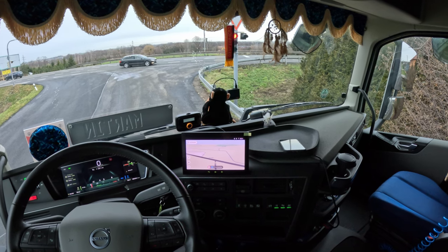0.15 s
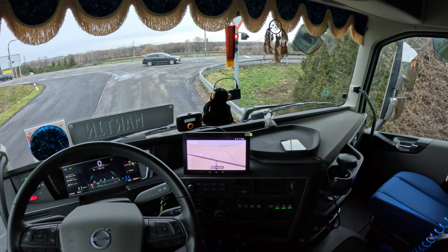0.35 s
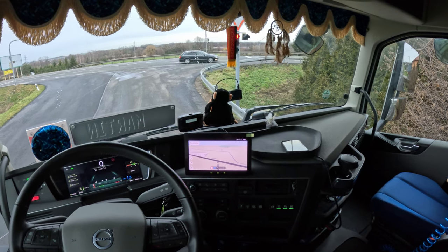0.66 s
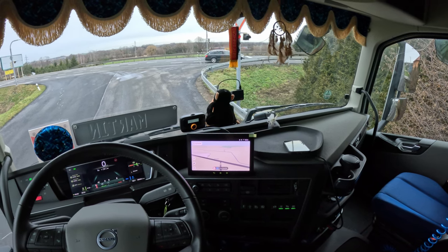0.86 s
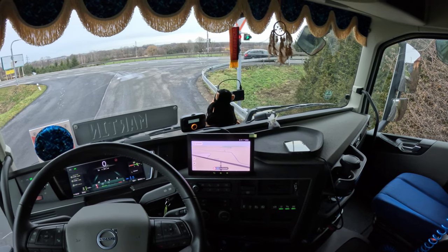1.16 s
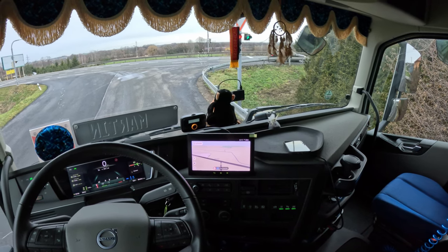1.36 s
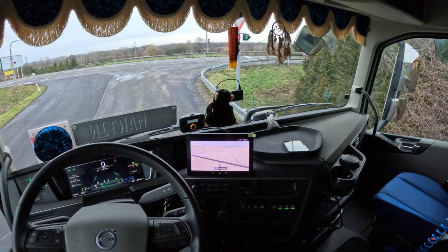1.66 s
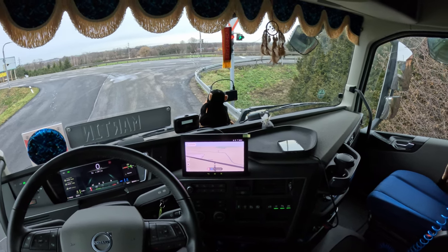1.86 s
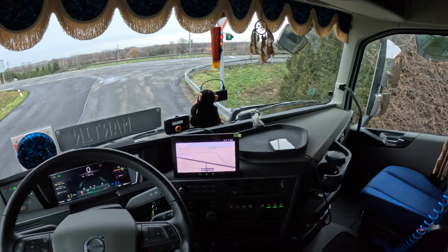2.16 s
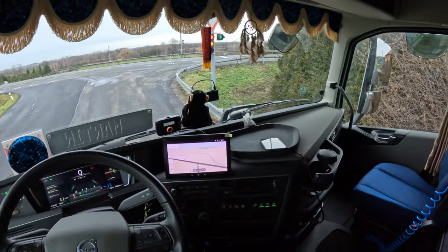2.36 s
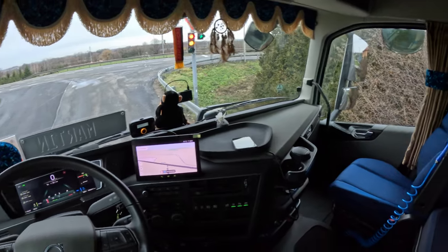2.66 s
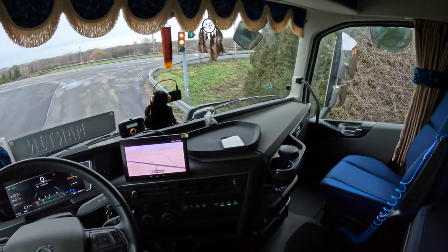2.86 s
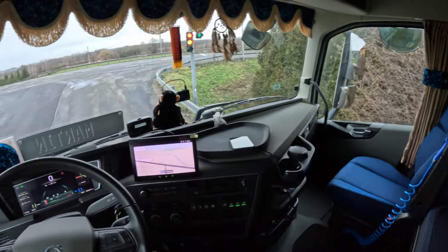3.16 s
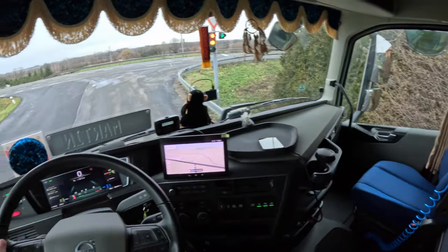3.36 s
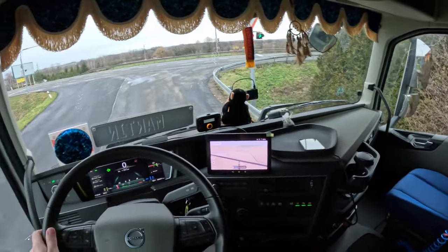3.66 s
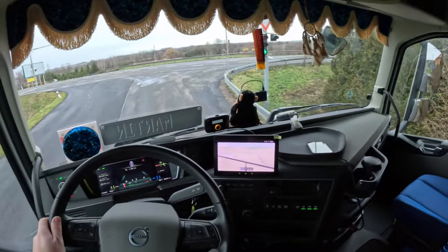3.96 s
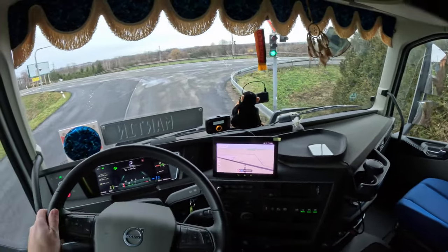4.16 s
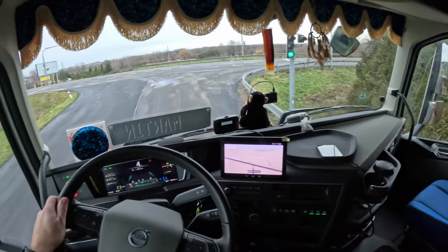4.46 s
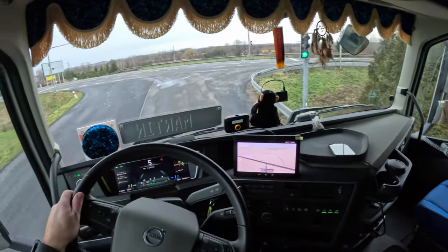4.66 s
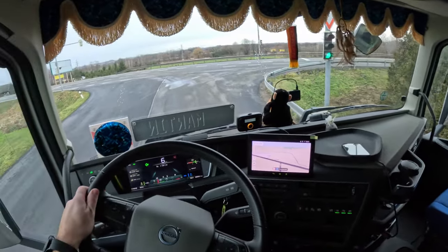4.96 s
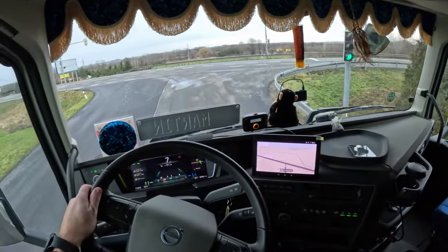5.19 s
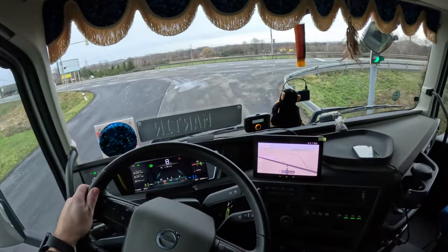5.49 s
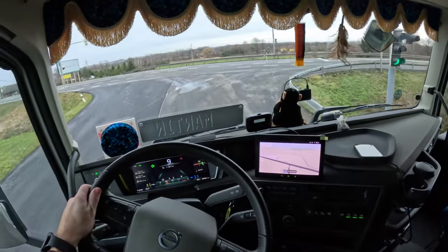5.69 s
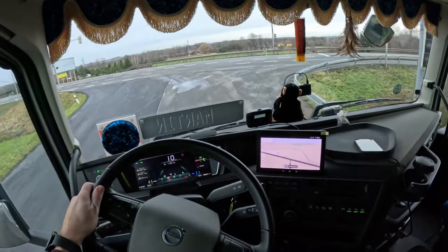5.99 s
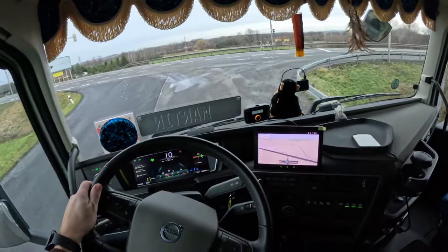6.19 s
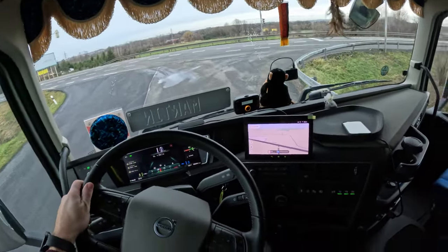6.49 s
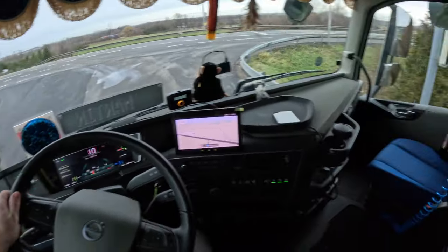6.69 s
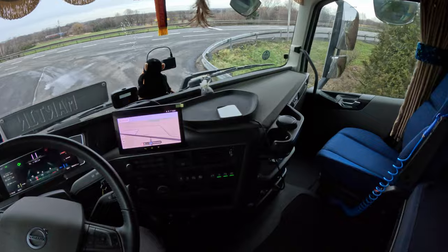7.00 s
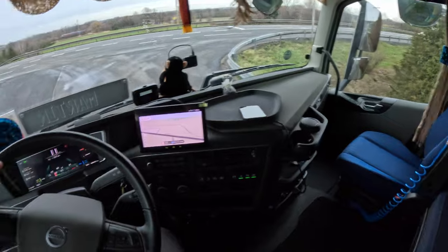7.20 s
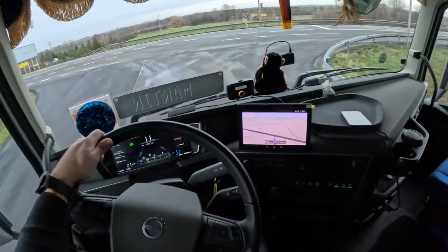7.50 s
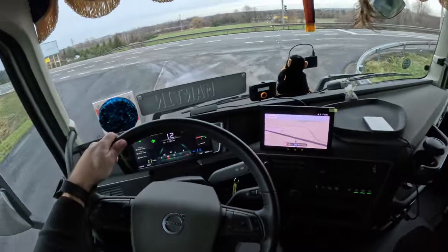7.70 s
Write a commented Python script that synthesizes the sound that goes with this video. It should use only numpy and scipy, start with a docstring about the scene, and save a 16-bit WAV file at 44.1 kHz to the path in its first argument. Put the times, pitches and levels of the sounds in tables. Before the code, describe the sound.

Heard from the driver's head inside a padded truck cab: a heavy diesel idles low and steady. At two seconds a dull double thump lands with a short air hiss and chirp. A stalk snaps over, the indicator starts a regular tick-tock, and the engine takes load, trim rattling briefly. It revs up in a growing roar, sags at a gear change with air puffs, then climbs again.

```python
"""A diesel engine idles, takes load and pulls away through a gear change, inside the cab of a heavy truck.
Over it come brake-air hisses and a thump, loose trim, a stalk snap, indicator ticks and a turbo whistle.
Engine tones are sines locked to the firing rate; roar, chassis rumble and air are noise shaped in frequency.
Knocks are decaying modes or short noise bursts, with a brief padded echo of the cab.
"""
import sys
import numpy as np
from scipy import signal
from scipy.fft import rfft, irfft
from scipy.io import wavfile
from scipy.ndimage import uniform_filter1d

SR = 44100
rng = np.random.default_rng(int(sys.argv[2]) if len(sys.argv) > 2 else 0)


def wav_record(signal):
    """Record a signal, one row per channel, as 16-bit PCM in the file named by sys.argv[1]."""
    frames = np.transpose(np.atleast_2d(signal))
    bounded = np.clip(frames, -1, 1)
    # unit amplitude maps onto the largest positive 16-bit level
    quanta = np.round(bounded * 32767).astype(np.int16)
    wavfile.write(sys.argv[1], SR, quanta)


N = 345743
T = np.arange(N) / SR
GEAR = 31 / 6  # gear whine as a multiple of the firing rate
TRIM_T60 = 0.04  # s, decay time of loose trim

# Spectrum of loose trim striking its seat: hz, density_db (dB per Hz)
TRIM_SPECTRUM = [(800, -26), (2000, 7.5), (3500, -0.5), (7000, -10), (9000, -19), (13000, -43.5)]
# Spectrum of the dry scratch under the indicator and the thumps: hz, density_db (dB per Hz)
SCRATCH_SPECTRUM = [(700, -26.5), (1100, 5), (1500, -3), (2200, -12.5), (3800, -14), (5000, -33),
                    (9000, -57.5)]


def gain_of(db):
    """Decibel law: converts a level in dB to an amplitude ratio."""
    return 10 ** (np.asarray(db) / 20)


def evened(x):
    """Normalisation by mean power: scales a signal to rms 1."""
    return x / np.sqrt(np.mean(x ** 2) + 1e-20)


def read(points, hz):
    """Logarithmic frequency scale: interpolates a spectrum between its points along log frequency."""
    f, value = np.transpose(points)
    return np.interp(np.log(hz + 1), np.log(f + 1), value)


def add(mix, s, sound):
    """Superposition: sums a sound into the mix from time s, cut at the end of the mix."""
    part = mix[..., round(s * SR):][..., :sound.shape[-1]]
    part += sound[..., :part.shape[-1]]


def drift(rate_hz, size=N):
    """Band-limited random fluctuation: random knots at rate_hz, resampled smoothly to rms 1."""
    knots = rng.standard_normal(int(size / SR * rate_hz) + 3)
    return evened(signal.resample(knots, size))


def noise(shape_db, patchy_db, size=1024):
    """Partly coherent stereo noise: shape_db(hz, s) sets its level over frequency and time."""
    # Likeness of left and right: hz, coherence (1 = the same)
    likeness = [(60, 1), (290, .98), (630, .9), (1370, .8), (3000, .7), (14300, .6)]
    # Phase by which the left leads: hz, lead_rad
    phase_lead = [(100, 0), (1810, -.6), (3530, -.6), (4480, 0)]
    # Level difference, left minus right: hz, lean_db
    level_lean = [(60, .5), (370, -.7), (1260, 1.5), (7800, 2.5), (14300, 7)]
    hop = size // 4
    frames, hz = N // hop + 5, np.fft.rfftfreq(size, 1 / SR)
    a, b, c, d, patches = rng.standard_normal((frames, len(hz), 5)).T
    # random patches of level, smoothed over neighbouring bins and frames
    patches = uniform_filter1d(patches, size=size // 100, axis=0)
    patches = evened(uniform_filter1d(patches, size=4096 // hop, axis=1))

    same = np.clip(read(likeness, hz), -1, 1)[:, None]
    left = a + 1j * b
    independent = c + 1j * d
    shared = same * left * np.exp(-1j * read(phase_lead, hz))[:, None]
    right = shared + np.sqrt(1 - same ** 2) * independent
    lean = gain_of(read(level_lean, hz) / 2)[:, None]

    frame_s = np.arange(frames) * hop / SR
    amplitude = gain_of(shape_db(hz, frame_s) + patchy_db * patches)
    spectra = np.array([left * lean, right / lean]) * amplitude
    return signal.istft(spectra, nperseg=size, noverlap=size - hop)[1][:, :N]


def banded(points, hz, lo_hz, hi_hz):
    """Power summed over a band: scales a spectrum so that noise made from it has rms 1 between lo and hi."""
    db = read(points, hz)
    inside = (hz >= lo_hz) & (hz < hi_hz)
    power = np.sum(gain_of(db[inside]) ** 2) / 1.5  # 1.5 allows for the overlapping windows
    return db - 10 * np.log10(power)


def ring(modes, rise_s):
    """Modal decay: a blow sets off damped sines (hz, level_db, t60_s), scaled together to peak 1."""
    t = np.arange(8192) / SR
    x = sum(gain_of(db - 60 * t / t60) * np.sin(2 * np.pi * hz * t) for hz, db, t60 in modes)
    x = x * (1 - np.exp(-t / rise_s))
    return x / abs(x).max()


def burst(points, tilt_db, t60, rise_s):
    """Impact noise: a coloured random burst with a fast rise and an exponential decay."""
    t, hz = np.arange(8192) / SR, np.fft.rfftfreq(8192, 1 / SR)
    colour = gain_of(read(points, hz) + tilt_db * np.log2(hz / 2000 + .1))  # tilt in dB per octave
    crack = evened(irfft(rfft(rng.standard_normal(len(t))) * colour))
    return crack * gain_of(-60 * t / t60) * (1 - np.exp(-t / rise_s))


def drive(t):
    """Operating point of the engine: firing rate, torque, roar level and load 0-1 at times t."""
    # Course of the drive: time_s, firing_rate_hz, torque_db, roar_db
    course = [(0, 27.62, -7, -50.5), (2.6, 27.42, -7.5, -49), (2.801, 29.58, 1.5, -49.5),
              (3.35, 29.02, -3.5, -49), (3.65, 29.17, 3, -49.5), (3.901, 28.65, 7, -49.5),
              (4.101, 28.4, 1, -48.5), (4.4, 35.2, 0.5, -45.5), (4.7, 43.71, -1, -42.5),
              (5.001, 50.33, 2, -39.5), (5.401, 53.37, -3, -38.5), (5.599, 57, -5, -38),
              (5.999, 58.5, -4, -36.5), (6.2, 59.66, -2, -37), (6.499, 56.31, -12, -37.5),
              (6.6, 51.68, -5, -39.5), (6.9, 47.58, -6, -40.5), (7.2, 50.54, 0.5, -39.5),
              (7.6, 56.3, -1, -37), (7.84, 57.63, -12, -36)]
    idle_db, full_db = -50, -37  # roar level at load 0 and at load 1
    s, *columns = np.transpose(course)
    hz, torque_db, roar_db = (np.interp(t, s, c) for c in columns)
    load = np.clip((roar_db - idle_db) / (full_db - idle_db), 0, 1)
    return hz, torque_db, roar_db, load


def engine_tones(turns, torque_db, load, hz):
    """Periodic forcing: sines at multiples of the firing rate, coloured by cab resonances."""
    # Firing, shaft orders, then gear whine and its overtones: multiple (of the firing rate)
    multiples = [1, 2, .5, 17 / 6, 3, GEAR, 2 * GEAR, 3 * GEAR, 4 * GEAR]
    # The same tones, ahead of cab gain: level_db, torque_share, full_load_gain_db, waver_db
    tone_levels = [(-26, .95, .3, 0.7), (-30.5, 0.77, 1, 2), (-31, 0, -2, 2.5), (-53, 0, 22, 2.5),
                   (-39, 0.3, 1.5, 3), (-34, 0.2, -0.8, 1.5), (-53.5, -.15, 2.5, 3), (-61, 0, 2, 3),
                   (-67, 0.1, 3, 3)]
    # How the cab passes those tones: hz, gain_db
    cab_gain = [(25.5, -13), (28, -1), (35, -2.5), (44, 6), (47, -8), (51, 1.5), (58, -3), (85, -14.5),
                (97, -7), (111, 5), (120, -10.5), (142, -19), (150, -8), (165, -3), (182, -20), (226, 1),
                (265, -4.5), (296, 6.5), (320, -2), (400, -2), (430, -8), (450, 1), (530, 5), (610, 2),
                (700, -4), (900, 7)]
    # Further tones, ahead of the fade with load and torque: multiple (of the firing rate), level_db
    idle_orders = [(.88, -44), (1.5, -53), (1.6, -52), (7 / 3, -46), (2.5, -51), (3, -43), (4, -50),
                   (4.5, -55), (6, -54), (7, -52), (12.81, -58), (15.32, -61)]
    waver_hz = 9  # how fast the tones waver in level
    tones = np.zeros(N)
    for k, (db, share, load_db, waver_db) in zip(multiples, tone_levels):
        level_db = db + share * torque_db + load_db * load
        level_db = level_db + read(cab_gain, k * hz) + waver_db * drift(waver_hz)
        tones += gain_of(level_db) * np.sin(2 * np.pi * (k * turns + rng.random()))
    for k, db in idle_orders:
        level_db = db - .5 * torque_db - 28.0 * load + 1.6 * drift(waver_hz / 2)
        tones += gain_of(level_db) * np.sin(2 * np.pi * (k * turns + rng.random()))
    return np.sqrt(2) * tones  # a sine of rms 1 peaks at root 2


def engine_roar(turns):
    """Amplitude-modulated noise: the roar brightens with load and throbs with each firing."""
    # Roar spectrum at idle: hz, density_db (dB per Hz)
    roar_idle = [(20, 5), (60, 18.5), (150, 1), (230, 8.5), (350, 3), (420, 0.5), (500, 1.5), (575, 2),
                 (660, -3.5), (950, -8), (1050, -4), (1150, -10.5), (1400, -9.5), (1490, -11.5),
                 (1650, -14), (3100, -32.5), (6000, -67), (9000, -53), (11000, -77.5)]
    # Roar spectrum at full load: hz, density_db (dB per Hz)
    roar_load = [(20, -0.5), (160, 14.5), (240, 8.5), (350, 10), (420, -1.5), (520, 5), (640, -0.5),
                 (900, -5), (1330, -10), (2000, -17.5), (5700, -39.5), (8800, -47.5), (10500, -72.5),
                 (14000, -91.5)]

    def shape_db(f, t):
        idle, full = (banded(p, f, 380, 850)[:, None] for p in (roar_idle, roar_load))
        _, _, roar_db, load = drive(t)
        return idle + (full - idle) * load + roar_db

    throb = 1 + 0.051 * np.cos(2 * np.pi * turns)
    return throb * noise(shape_db, patchy_db=1)


def engine():
    """Phase locking: tones and throb follow one slightly unsteady count of firings."""
    hz, torque_db, _, load = drive(T)
    turns = np.cumsum(hz * (1 + 0.003 * drift(4.0))) / SR  # firings so far
    tones = engine_tones(turns, torque_db, load, hz)
    return tones * gain_of([[.25], [-.25]]) + engine_roar(turns)


def chassis():
    """Low-frequency resonance: lumpy shaking booms in the cab and grows with load and torque."""
    # Chassis rumble: hz, density_db (dB per Hz)
    rumble = [(6, -24), (12, -1.5), (22, 11.5), (36, -2), (65, 7), (100, 4.5), (125, -1.5), (162, 5),
              (200, -4.5), (300, -14), (600, -73)]

    def shape_db(f, t):
        _, torque_db, _, load = drive(t)
        level_db = -38.5 + 10.5 * load + 0.32 * torque_db
        return banded(rumble, f, 65, 200)[:, None] + level_db

    return noise(shape_db, patchy_db=0.5, size=4096)


def airflow_db(f, t):
    """Addition of powers: each hiss opens, glides in level and shuts, over a steady seep."""
    # Hisses in lines and vents: start_s, length_s, first_db, last_db, tilt_db (dB per octave)
    puffs = [(2.028, 0.058, -66, -64.5, -0.5), (2.136, 0.26, -76.5, -81, 0), (2.5, 0.18, -74.5, -75, 9.5),
             (2.624, 0.027, -68.5, -63, 6.5), (2.68, 1.3, -72, -72, 0), (3.423, 0.17, -63, -64.5, -0.5),
             (3.66, 0.25, -68, -70, -5.5), (3.932, 0.18, -79, -78, 2), (4.15, 3.7, -71.5, -71.5, 0),
             (4.79, 0.12, -69, -70, 1), (7.03, 0.15, -63.5, -62.5, 1.5), (7.248, 0.16, -59.5, -57, 1)]
    seep_db, open_s, shut_s = -85.5, 0.2, 0.043  # steady seep; ramps ahead of and after each hiss
    power = gain_of(seep_db) ** 2 + np.zeros((len(f), len(t)))
    for start, length, first_db, last_db, tilt_db in puffs:
        end = start + length
        opening, shutting = (t - start) / open_s + 1, (end - t) / shut_s + 1
        gate = np.clip(np.minimum(opening, shutting), 0, 1) ** 2
        level = gate * gain_of(np.interp(t, [start, end], [first_db, last_db]))
        power += np.outer(gain_of(tilt_db * np.log2(f / 6000 + .1)), level) ** 2
    return 10 * np.log10(power)


def hisses():
    """Turbulent jet noise: air escapes as broadband hiss, and weak flow loses its top."""
    # Spectrum of escaping air: hz, density_db (dB per Hz)
    hiss = [(1500, -30), (3500, -5), (4670, -2), (5650, -3), (6930, -5), (9200, -14), (10200, -22),
            (12200, -17), (14500, -30)]

    def shape_db(f, t):
        flow_db = airflow_db(f, t)
        dull_db = np.clip(f / 1500 - 6, 0, 1)[:, None] * np.clip(-60 - flow_db, 0, 20)
        return banded(hiss, f, 4000, 9000)[:, None] + flow_db - dull_db

    return noise(shape_db, patchy_db=2.2, size=512)


def whistles():
    """Frequency modulation: thin gliding tones of air lines and turbo, blurred by random pitch wander."""
    # One list for each whistle: time_s, pitch_hz, level_db
    glides = [
        [(1.94, 7300, -84), (1.97, 8000, -80), (2.01, 7400, -84)],
        [(2.075, 8000, -82), (2.11, 8500, -84), (2.15, 8650, -83), (2.19, 8000, -88)],
        [(4.29, 9100, -87), (4.38, 10300, -87), (4.45, 10350, -89)],
        [(1.97, 5520, -78), (2.03, 5520, -80), (2.045, 5500, -68), (2.06, 5520, -85)],
        [(3.6, 5650, -72), (3.87, 5900, -70), (3.95, 6250, -77), (4.2, 6540, -77), (4.33, 6960, -73),
         (4.51, 7600, -76), (4.55, 8600, -83), (4.59, 8750, -79), (4.64, 8200, -86)],
    ]
    out = np.zeros((2, N))
    for rows in glides:
        s, hz, db = np.transpose(rows)
        t = np.arange(s[0], s[-1], 1 / SR)
        pitch_hz = np.interp(t, s, hz)
        blur = .012 + .03 * np.clip(6.1 - pitch_hz / 1000, 0, 1)  # breathier when low
        blur = blur * np.clip(len(t) / SR + .3, 0, 1)  # short chirps stay thin
        turns = np.cumsum(pitch_hz * (1 + blur * drift(900., len(t)))) / SR
        level_db = np.interp(t, s, db) + 4. * drift(30., len(t))
        tone = gain_of(level_db) * np.sin(2 * np.pi * turns)
        fade = signal.windows.tukey(len(t), .03 * SR / len(t))
        add(out, s[0], tone * fade * gain_of([[2.5], [-.6]]))
    return out


def thumps(out):
    """Modal excitation: each thump rings low modes over a faint dull scratch."""
    # Modes of the thump: hz, level_db, t60_s
    thud = [(83.5, -10, 0.2), (170, -8, 0.17), (210, -4, 0.16), (280, 0, 0.11), (330, -1, 0.085),
            (428, -2, 0.07), (483, -11, 0.07), (547, -8, 0.06), (630, -13, 0.05), (1060, -11, 0.03)]
    # Blows: time_s, level_db (peak of the ringing, ahead of panning and echo)
    blows = [(2.0622, -13.5), (2.0683, -16), (2.0855, -24), (2.097, -25)]
    for s, db in blows:
        add(out, s, gain_of(db) * ring(thud, 0.0016))
        add(out, s, gain_of(db - 20.0) * burst(SCRATCH_SPECTRUM, -8.5, 0.065, 0.0017))


def trim(out):
    """Impact noise of loose parts: single ticks, and a regular rattle as the clutch bites."""
    # Single ticks: time_s, level_db
    ticks = [(2.9527, -54), (3.0694, -64), (4.07, -51), (5.304, -42), (5.474, -44), (5.512, -39.5)]
    for s, db in ticks:
        add(out, s, gain_of(db) * burst(TRIM_SPECTRUM, 0, TRIM_T60, 0.00085))
    start_s, every_s, count = 4.119, .035, 7  # spaced close to the firing period
    for k in range(count):
        add(out, start_s + k * every_s, gain_of(-57) * burst(TRIM_SPECTRUM, 5.5, TRIM_T60, 0.0016))


def stalk(out):
    """Snap-through of a sprung detent: the indicator stalk cracks over and bounces."""
    # Spectrum of the stalk: hz, density_db (dB per Hz)
    stalk_spectrum = [(400, 0.5), (690, 5), (1100, 3.5), (1500, -4), (3200, -8), (4500, -2), (7000, -10.5),
                      (9000, -27.5), (13500, -46)]
    # Detent and its bounces: time_s, level_db, tilt_db (dB per octave), t60_s
    snaps = [(3.218, -30, 1.5, 0.024), (3.221, -44, 0.5, 0.14), (3.2642, -22, 7, 0.026),
             (3.268, -22.5, -3.5, 0.073)]
    for s, db, tilt_db, t60 in snaps:
        add(out, s, gain_of(db) * burst(stalk_spectrum, tilt_db, t60, 0.0018))


def indicator(out):
    """Modal excitation: tick and tock weigh the same panel modes differently, over a dry scratch."""
    # Modes of the dashboard panel: hz, tick_db, tock_db, t60_s
    panel_modes = [(930, -20, 0, .1), (990, -6, 11, .04), (1060, 3, 5, .028), (1160, 3, -6, .04),
                   (1306, 9, 2, .04), (1420, 0, -12, .03), (1600, -3, -14, .04), (1940, -2, -13, .05),
                   (2220, -9, -9, .045), (2400, -12, -11, .04), (2510, -9, -24, .04), (2790, -12, -15, .04),
                   (3590, -15, -28, .045)]
    # Tick, then tock: level_db, rise_s, scratch_db (relative), scratch_tilt_db (dB per octave)
    strokes = [(-28, .001, -13, 0), (-25.5, .003, -17, -2)]
    start_s, every_s, count = 3.3868, .33993, 14
    for k in range(count):
        db, rise_s, scratch_db, tilt_db = strokes[k % 2]
        modes = [(row[0], row[1 + k % 2], row[3]) for row in panel_modes]
        scratch = gain_of(scratch_db) * burst(SCRATCH_SPECTRUM, tilt_db, 0.07, rise_s)
        add(out, start_s + k * every_s, gain_of(db) * (ring(modes, rise_s) + scratch))


def knocks():
    """Superposition of impacts: thumps, loose trim, stalk and indicator in one channel."""
    out = np.zeros(N)
    for source in (thumps, trim, stalk, indicator):
        source(out)
    return out


def cab(x, t60=0.05):
    """Reverberation in a padded space: sparse echoes of random sign die away exponentially."""
    size = SR // 4
    taps = np.zeros((2, size))
    # one tap in each 20-sample slot, placed apart for left and right
    at = np.arange(80, size - 20, 20) + rng.integers(0, 20, (2, (size - 81) // 20))
    np.put_along_axis(taps, at, rng.choice([-1., 1.], at.shape), 1)
    tail = taps * gain_of(-60 * np.arange(size) / SR / t60)
    return signal.oaconvolve(x[None], tail / np.linalg.norm(tail[0]), axes=1)[:, :N]


def scene():
    """Level panning: engine, chassis and air surround knocks that lean left, with their cab echo."""
    hits = knocks()
    panned = hits * gain_of([[1.4], [-1.8]])
    return engine() + chassis() + hisses() + whistles() + panned + gain_of(-3.5) * cab(hits)


def record(dry):
    """Band limitation: a linear-phase low-pass removes what lies above its edge."""
    edge_hz = 14700
    low_pass = signal.firwin(511, edge_hz, window=("kaiser", 9), fs=SR)
    return signal.oaconvolve(dry, low_pass[None], "same")


dry = scene()
out = record(dry)
wav_record(out)
```